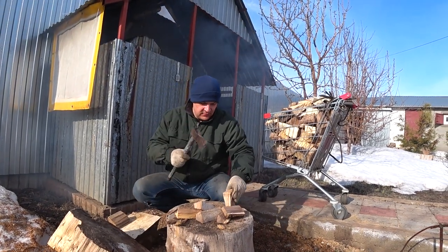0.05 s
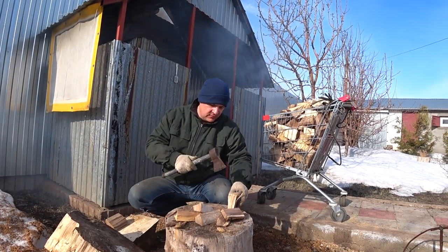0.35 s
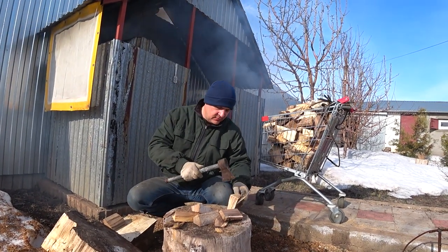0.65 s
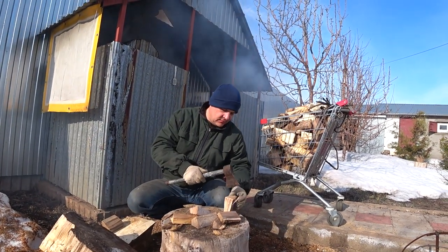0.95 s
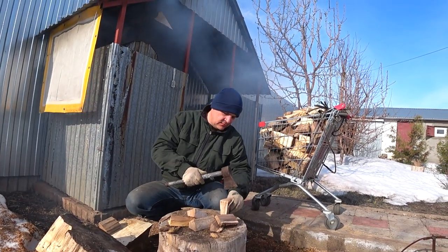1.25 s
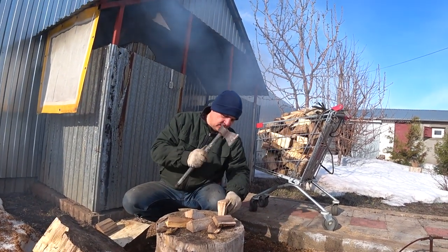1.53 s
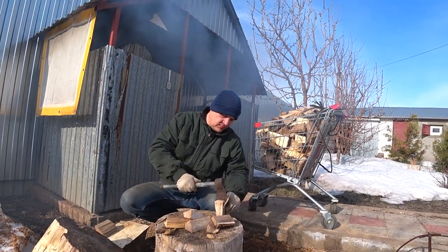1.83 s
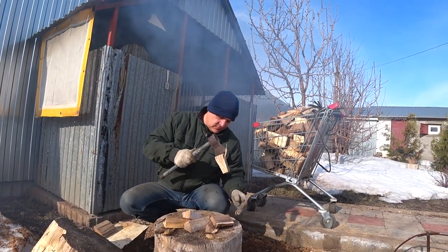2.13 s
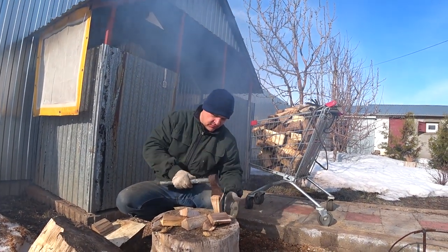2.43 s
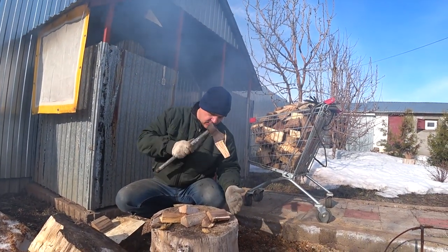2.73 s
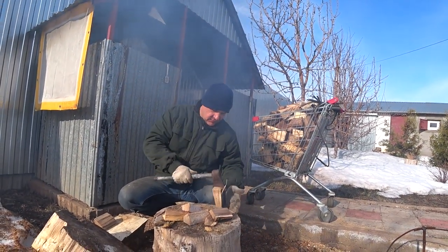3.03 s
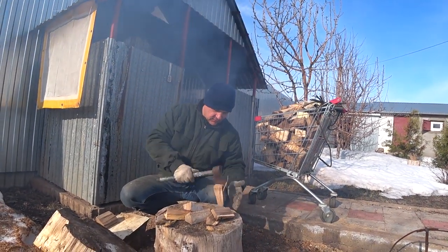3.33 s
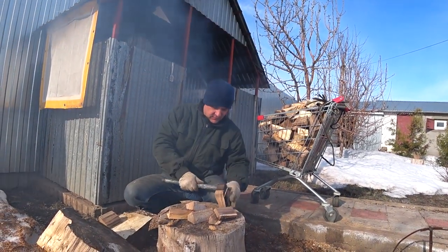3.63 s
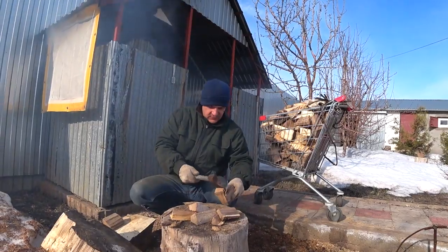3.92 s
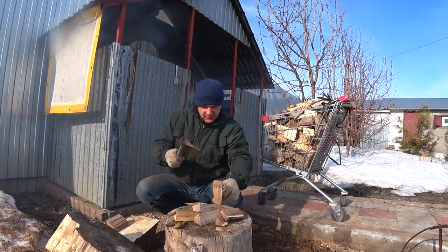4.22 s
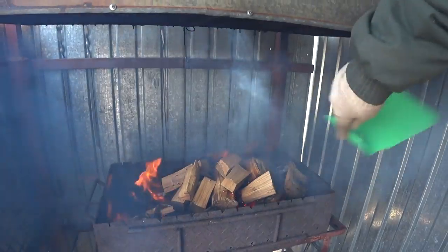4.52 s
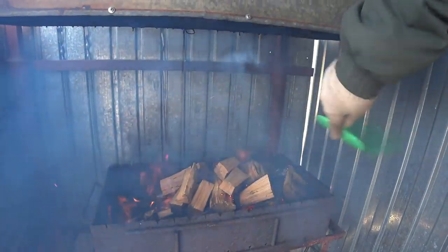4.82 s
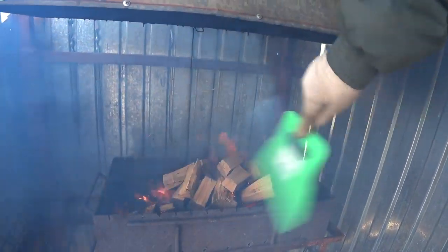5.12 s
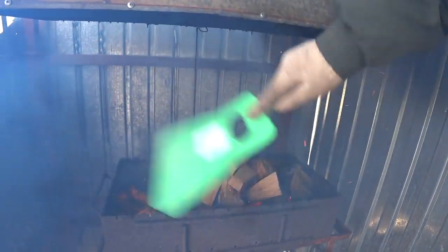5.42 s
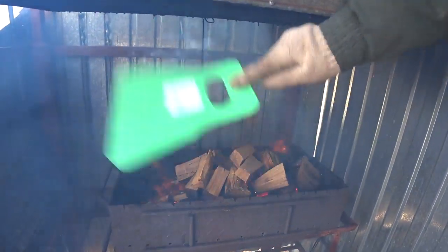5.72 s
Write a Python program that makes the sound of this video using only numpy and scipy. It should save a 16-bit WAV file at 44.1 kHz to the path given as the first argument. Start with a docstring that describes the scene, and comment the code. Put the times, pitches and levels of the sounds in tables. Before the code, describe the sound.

Wind rumbles on the microphone outdoors while kindling is set up with light clicks. Four sharp hatchet blows follow, with splintering wood, a hollow thud from the block and an echo around the yard. After a few more wooden ticks, the scene switches abruptly to a nearby fire in a metal grill. Embers hiss and pop, four fanning strokes whoosh through them, and a single sheet-metal clang rings out early on.

```python
"""A yard beside a sheet-metal shed: a hatchet splits kindling on a block. Each blow knocks and cracks,
billet and block ring, fibres tear, and the wall and yard echo. Then, close to a steel grill, a plastic
paddle fans a wood fire: it crackles and rushes with each stroke, and once the paddle hits the sheet
steel, which clangs. Wind buffets the microphone in both places."""
import sys
import numpy as np
from scipy import signal
from scipy.io import wavfile
from scipy.ndimage import uniform_filter1d

SR = 44100
rng = np.random.default_rng(int(sys.argv[2]) if len(sys.argv) > 2 else 0)


def log_audio(samples):
    """Write samples as a 16-bit WAV file to the path given in sys.argv[1]."""
    # one column per channel
    frames = np.atleast_2d(samples).T
    # limit to full scale, then quantise
    limited = np.clip(frames, -1, 1)
    pcm = np.round(limited * 32767).astype(np.int16)
    wavfile.write(sys.argv[1], SR, pcm)


N = 258426
TIME_S = np.arange(N) / SR
CHOP_END_S, FIRE_START_S = 4.402, 4.414
TICK_T60_S = 0.059

# hatchet blows: start_s, knock_db, knock_hz, billet_db, crack_db,
# landing_delay_s, landing_db, landing_hz, thud_db, echo_db, echo_hz
CHOPS = [(1.906, -0.5, 1110, -15.5, -12, 0.0102, -10, 1260, -20.5, -36, 1390),
         (2.4868, -1, 1150, -22, -15.5, 0.013, -7, 824, -25, -33.5, 1330),
         (3.0212, -10, 1264, -21.5, -12, 0.013, -7.5, 2100, -30, -30, 2510),
         (3.5013, -3, 940, -24.5, -21.5, 0.043, -15.5, 1070, -35, -42, 1270)]
# billet modes: pitch_hz, width_hz, level_db
BILLET_MODES = [(452, 70, -6), (840, 70, -7), (1160, 200, -2.5), (1401, 14, -4.5), (1687, 60, -2.5),
                (1980, 41, -3), (2200, 60, -18), (2823, 32, -6.5), (3680, 87, -7.5), (5900, 77, -18)]
# modes of block, hatchet head and grill sheet: pitch_hz, level_db, t60_s
BLOCK_MODES = [(398, -9.5, 0.15), (450.5, -4, .2), (945, -13.5, .3), (1190, -15.5, 0.23),
               (1297, -15.5, .36), (1436, -14.5, 0.45), (2099, -22, 0.43)]
BLADE_MODES = [(4180, -0.5, 0.2), (7574, -17, 0.56), (14090, -7, 0.22)]
SHEET_MODES = [(240, -18.5, 1.44), (289, -18, 1.17), (351.3, -14.5, 1.36), (481.4, -10, 0.79),
               (544, -16, 0.97), (575, -15, 0.56), (628, -17, .55), (827, -16, 0.75), (1072, -20, 0.72),
               (1110, -30, 0.48), (1354, -27, 0.71), (1484, -28, 0.63), (1622, -18, 0.44),
               (1913, -20.5, 0.42), (2560, -22, 0.29), (2700, -23, .35)]
# tears along the grain: start_s, level_db, t60_s
SPLITS = [(1.228, -31.5, 0.19), (2.501, -27.5, 0.028), (3.504, -17, 0.029), (3.5117, -19, 0.066),
          (3.54, -29, 0.048)]
# blade grazes: start_s, level_db
GRAZES = [(3.94, -55), (3.966, -43.5)]
# clicks of handled wood, pops of the fire: start_s, level_db, pitch_hz
WOOD_TICKS = [(0.196, -46.5, 900), (0.426, -43, 5800), (0.515, -34.5, 5500), (1.99, -41, 2140),
              (3.106, -27, 2400), (3.125, -35, 7000), (3.876, -36, 7200), (4.3248, -34, 7500),
              (4.3425, -36.5, 7060)]
FIRE_POPS = [(4.4155, -32, 3870), (4.885, -30, 10000), (5.4178, -21, 9400), (5.5593, -23.5, 5700)]
# billet shifting in the glove: start_s, end_s, level_db
HANDLING_SPANS = [(0.181, 0.602, -45), (3.781, 3.963, -38.5)]
# paddle strokes: centre_s, rush_db, puff_db
STROKES = [(4.546, -29, -16.5), (5.075, -30.5, -16.5), (5.345, -31, -7), (5.622, -27, -28)]
# time the clang stays level before it decays: freq_hz, hold_s
CLANG_HOLD = [(300, 0.071), (1200, 0.096), (4000, 0.044), (8000, 0.012), (15000, 0.013)]
# decay of clang and yard echo: freq_hz, t60_s
CLANG_T60 = [(200, 1), (500, 0.74), (1000, 0.44), (2000, 0.32), (4000, 0.27), (8000, 0.28), (15000, 0.093)]
YARD_T60 = [(150, 1.5), (700, 1.19), (1800, 1.196), (4000, 0.83), (8000, 0.35), (15000, 0.17)]
# breeze strength: time_s, level_db
BREEZE = [(0, -23.5), (0.22, -46), (0.5, -48), (0.92, -42.5), (1.15, -42.5), (1.3, -57), (1.44, -45.5),
          (1.78, -60), (1.95, -38), (2.25, -39), (2.5, -35), (3.2, -39), (3.48, -48.0), (4.1, -25.5),
          (4.33, -40), (4.55, -25.5), (5.05, -22.5), (5.86, -30.5)]
# gusts on the microphone ports: centre_s, level_db, pitch_hz, sigma_s
GUSTS = [(0.01, -22.5, 139.6, 0.016), (0.64, -40.5, 97, 0.03), (0.899, -34, 128, 0.008),
         (1.162, -32.5, 124, 0.007), (2.546, -22, 136, 0.011), (2.913, -30, 197, 0.008),
         (3.2, -30.5, 167, 0.007), (3.891, -21, 230, 0.0066), (3.914, -15.5, 280, 0.004),
         (3.943, -11, 302, 0.0046), (4.007, -15.5, 285, 0.006), (4.102, -18.5, 210, 0.008),
         (4.168, -14, 121, 0.007), (4.951, -12, 198, 0.0082), (5.267, -16.5, 242, 0.011)]

# noise spectra: freq_hz, density_db
CRACK_SPECTRUM = [(400, -9), (900, 3.5), (2500, 1.5), (4500, -9.5), (10000, -15), (16000, -32)]
THUD_SPECTRUM = [(110, -2), (250, -11), (430, 1), (600, -12), (900, -18)]
FIBRE_SPECTRUM = [(400, -7), (1200, -10.5), (2500, -7.5), (4400, -8.5), (6000, -6.5), (10700, -14),
                  (16000, -19)]
RUSH_SPECTRUM = [(160, -2.5), (250, -3.5), (450, -3), (700, -8), (1100, -16.5), (2200, -22), (5500, -27.5),
                 (10400, -33.5), (16000, -54)]
EMBER_SPECTRUM = [(200, 6), (450, 0), (900, -10.5), (2000, -19.5), (6000, -32), (10500, -23.5),
                  (15500, -37)]
CLANG_SPECTRUM = [(120, -18), (200, -12), (548, -2), (763, -9), (821, -5), (1400, -12.5), (1650, -9),
                  (2250, -12.5), (2560, -11), (10100, -25), (16000, -34)]
YARD_SPECTRUM = [(200, 0.5), (450, -10), (700, -0.5), (1400, 1.5), (3000, -1.5), (6000, -10.5), (10000, -8),
                 (15000, -29.5)]
WIND_SPECTRUM = [(20, 0.5), (45, -1), (90, -3.5), (170, -11), (300, -26.5), (600, -31.5), (1200, -64)]
AIR_SPECTRUM = [(200, -11.5), (450, -4.5), (800, -8.5), (1600, -10.5), (4000, -16.5), (6500, -18),
                (10000, -21.5), (16000, -19.5)]
# left-right likeness: freq_hz, correlation
DIRECT_CORR = [(200, 1), (10000, 0.85)]
NEAR_CORR = [(300, 1), (1200, 0.65), (10000, 0.87)]
DIFFUSE_CORR = [(200, 0.91), (1500, 0.2), (10000, 0.27)]
WIND_CORR = [(30, 1), (90, 0.37), (200, -0.66), (500, -1)]
EDDY_CORR = [(40, 0.48), (150, -0.12), (400, -0.77)]


def hatchet(thud_t60_s=0.11, wall_db=-13, splinter_db=-33, splinters_per_blow=12):
    """The blade bites and drives the billet onto the block, which thuds and rings; splinters snap."""
    out, t = np.zeros((2, N)), TIME_S[:SR // 2]
    for start_s, knock_db, knock_hz, billet_db, crack_db, *landing in CHOPS:
        delay_s, landing_db, landing_hz, thud_db, *_ = landing
        add(out, start_s, wood_hit(t, knock_db, knock_hz, billet_db, crack_db))
        lands = wood_hit(t, landing_db, landing_hz, billet_db=landing_db - 19, crack_db=landing_db - 13.5)
        add(out, start_s + delay_s, lands)
        thud = noise(THUD_SPECTRUM, DIRECT_CORR, t) * decay(t, thud_t60_s)
        hollow = sum(from_db(db) * ring(t, hz, t60_s) for hz, db, t60_s in BLOCK_MODES)
        add(out, start_s + 0.007, from_db(thud_db) * (thud + hollow) * rise(t, 0.013))
    splinters = [(start_s + 0.02 + 0.14 * late ** 2, splinter_db - 12 * late, 2000 + 6000 * high)
                 for start_s, *_ in CHOPS for late, high in rng.random((splinters_per_blow, 2))]
    return out + from_db(wall_db) * wall_echo(out) + yard_echo() + snaps(splinters, t60_s=0.015)


def wood_hit(t, knock_db, knock_hz, billet_db, crack_db):
    """Struck wood: a dead knock, a bright crack and billet modes, the broad ones dying first."""
    modes = 0
    for hz, width_hz, db in BILLET_MODES:
        gain = from_db(db + rng.normal(0, 2)) * rng.choice([-1, 1])
        modes += gain * knock(t, hz, t60_s=0.048 * np.sqrt(50 / width_hz))
    crack = noise(CRACK_SPECTRUM, DIRECT_CORR, t) * decay(t, t60_s=0.032)
    crack *= from_db(3.7 * drift(770, len(t)))
    body = knock(t, knock_hz, t60_s=0.011)
    return from_db(knock_db) * body + from_db(billet_db) * modes + from_db(crack_db) * crack


def knock(t, hz, t60_s):
    """A damped wooden mode that swells during contact."""
    return ring(t, hz, t60_s) * rise(t, 0.0016)


def splitting(grain_db=1.0, wall_db=-12):
    """Fibres give way in a dense run of tiny snaps."""
    out, t = np.zeros((2, N)), TIME_S[:SR // 3]
    for start_s, db, t60_s in SPLITS:
        tearing = noise(FIBRE_SPECTRUM, DIRECT_CORR, t) * from_db(grain_db * drift(1200, len(t)))
        add(out, start_s, from_db(db) * tearing * decay(t, t60_s) * rise(t, 0.0025))
    return out + from_db(wall_db) * wall_echo(out)


def blade(tick_above_ring_db=11, tick_hz=4000):
    """The steel head clicks and sings faintly as it grazes the wood."""
    out, t = np.zeros((2, N)), TIME_S[:SR // 2]
    modes = sum(from_db(db) * ring(t, hz, t60_s) for hz, db, t60_s in BLADE_MODES)
    for start_s, db in GRAZES:
        add(out, start_s, from_db(db) * modes)
    ticks = [(start_s, db + tick_above_ring_db, tick_hz) for start_s, db in GRAZES]
    return out + snaps(ticks, TICK_T60_S)


def handling(stick_hz=(2300, 3050, 4360, 6770), stick_q=44, stick_db=4.5, sleeve_db=-60, per_span=4):
    """A sleeve rustles as the arm lifts; thin kindling clicks and rings as it is set up and turned."""
    shifts = [(start_s + when * (end_s - start_s), db - 6 * soft, 3500 + 4000 * high)
              for start_s, end_s, db in HANDLING_SPANS for when, soft, high in rng.random((per_span, 3))]
    clicks = snaps(WOOD_TICKS + shifts, TICK_T60_S)
    sticks = sum(resonate(clicks + 1e-18, hz, stick_q) for hz in stick_hz)
    cloth = noise([(1500, 1), (9000, -2), (15000, -17)], NEAR_CORR, TIME_S)
    sleeve = swell(TIME_S, centre_s=0.036, sigma_s=0.065) * cloth
    return 0.98 * clicks + from_db(stick_db) * sticks + from_db(sleeve_db) * sleeve


def fire(burn_db=-41, flutter_db=3.0, backswing_s=0.13, backswing_db=-10.5, crackle_db=-47, count=30):
    """Embers hiss, crackle and pop; each stroke and its backswing drive air through them."""
    draught = 0
    for centre_s, db, _ in STROKES:
        stroke = swell(TIME_S, centre_s, sigma_s=0.024)
        backswing = swell(TIME_S, centre_s + backswing_s, sigma_s=0.045)
        draught += from_db(db) * (stroke + from_db(backswing_db) * backswing)
    rush = draught * from_db(flutter_db * drift(130, N)) * noise(RUSH_SPECTRUM, NEAR_CORR, TIME_S)
    burn = from_db(burn_db) * noise(EMBER_SPECTRUM, NEAR_CORR, TIME_S)
    span_s = TIME_S[-1] - FIRE_START_S
    crackles = [(FIRE_START_S + when * span_s, crackle_db + 13 * size ** 2, 4000 + 7000 * high)
                for when, size, high in rng.random((count, 3))]
    crackling = snaps(crackles, t60_s=0.026) + snaps(FIRE_POPS, t60_s=0.065)
    return (rush + burn) * (TIME_S > FIRE_START_S) + crackling


def clang(start_s=4.733, dense_db=-16, modes_db=-6, build_s=0.069):
    """The paddle hits sheet steel; the clang holds briefly, then fades as low modes build and ring on."""
    out, t = np.zeros((2, N)), TIME_S[:SR * 3 // 2]
    dense = noise(CLANG_SPECTRUM, NEAR_CORR, t,
                  lambda hz: decay(t - at_hz(CLANG_HOLD, hz), at_hz(CLANG_T60, hz)))
    modes = sum(from_db(db) * ring(t + rng.random() / hz, hz, t60_s) for hz, db, t60_s in SHEET_MODES)
    add(out, start_s, from_db(dense_db) * dense * rise(t, 0.0056))
    add(out, start_s, from_db(modes_db) * modes * rise(t, build_s))
    return out


def wall_echo(dry, t60_s=0.34):
    """Quick scattered echoes off the shed wall and the ground."""
    t = TIME_S[:SR // 3]
    scatter = noise([(150, 14.0), (1200, 4.5), (4000, -0.5), (15000, 2.0)], NEAR_CORR, t)
    response = unit_rms(scatter * decay(t, t60_s) * rise(t, 0.019)) / np.sqrt(len(t))
    return signal.fftconvolve(dry, response, axes=1)[:, :N]


def yard_echo(focus_db=4.5, focus_oct=0.77, peak_q=2.8, peak_mix=0.91):
    """Fences and trees scatter each blow into a long tail, strongest around one pitch."""
    out, t = np.zeros((2, N)), TIME_S[:SR]
    for start_s, *_, echo_db, echo_hz in CHOPS:
        def envelope(hz):
            focus = np.exp(-0.5 * (np.log2(hz / echo_hz) / focus_oct) ** 2)
            return from_db(focus_db * (focus - 1)) * decay(t, at_hz(YARD_T60, hz))
        tail = noise(YARD_SPECTRUM, DIFFUSE_CORR, t, envelope)
        tail = (tail + peak_mix * resonate(tail, echo_hz, peak_q)) / np.sqrt(1 + peak_mix)
        add(out, start_s, from_db(echo_db) * tail * rise(t, 0.09))
    return out


def wind(trim_db=-1.5, lump_db=4.5, tilt_per_oct=0.36, neutral_db=-36, top_hz=650):
    """Lumpy turbulence on the microphone ports, brighter when it blows harder."""
    gust_db = breeze_db(TIME_S) + lump_db * drift(40, N)
    tilt_db_per_oct = tilt_per_oct * (gust_db - neutral_db)
    rumble = noise(WIND_SPECTRUM, WIND_CORR, TIME_S,
                   lambda hz: from_db(trim_db + gust_db + tilt_db_per_oct * max(np.log2(hz / 70), 0)))
    return lowpass(rumble, top_hz, order=4)


def eddies(puff_delay_s=0.094, ragged_db=2.0, count=36, top_hz=1020):
    """Gusts, paddle puffs and small chance eddies push on one port and pull on the other."""
    # columns as in GUSTS
    puffs = [(stroke_s + puff_delay_s, db, 201, 0.005) for stroke_s, _, db in STROKES]
    times_s = (np.arange(count) + rng.random(count)) * TIME_S[-1] / count
    small = [(centre_s, breeze_db(centre_s) + rng.normal(-2, 2.5), 190, 0.004) for centre_s in times_s]
    out = np.zeros((2, N))
    for centre_s, db, hz, sigma_s in GUSTS + puffs + small:
        start_s = max(centre_s - 4 * sigma_s, 0)
        t = TIME_S[:round(8 * sigma_s * SR)]
        push = swell(start_s + t, centre_s, sigma_s)
        spectrum = [(hz / 3, -6), (hz, 0), (hz * 2, -12), (hz * 5, -42)]
        eddy = push * from_db(ragged_db * drift(150, len(t))) * noise(spectrum, EDDY_CORR, t)
        add(out, start_s, from_db(db) * unit_rms(eddy) * np.sqrt(np.mean(push ** 2)))
    return lowpass(out, top_hz, order=4)


def breeze_db(t):
    """Breeze strength at time t."""
    return np.interp(t, *np.transpose(BREEZE))


def air(hiss_db=-60, port_hz=7900, port_width_hz=900, port_db=-73):
    """Faint outdoor hiss with a small resonance of the microphone port."""
    port = resonate(rng.standard_normal(N), port_hz, port_hz / port_width_hz)
    hiss = noise(AIR_SPECTRUM, DIFFUSE_CORR, TIME_S)
    return from_db(hiss_db) * hiss + from_db(port_db) * unit_rms(port)


def snaps(rows, t60_s):
    """Dry clicks, each a noise burst in one broad band."""
    out, t = np.zeros((2, N)), TIME_S[:SR // 10]
    envelope = decay(t, t60_s) + 2 * decay(t, 0.011)
    for start_s, peak_db, hz in rows:
        white = rng.standard_normal(len(t)) + 0.3 * rng.standard_normal((2, len(t)))
        click = bandpass(white * envelope, hz * 0.57, min(hz * 1.8, 0.33 * SR))
        add(out, start_s, from_db(peak_db) * click / np.abs(click).max())
    return out


def noise(spectrum, correlation, t, envelope=lambda hz: 1):
    """Stereo noise in half-octave bands, rms 1 before each band gets its envelope(hz)."""
    edges_hz = 20 * 2 ** np.arange(0, 10.1, 0.5)
    white = rng.standard_normal((2, 2, len(t) + 4000))
    out, power = np.zeros((2, len(t))), 0
    for band, (low_hz, high_hz) in enumerate(zip(edges_hz, edges_hz[1:])):
        if high_hz < spectrum[0][0] or low_hz > spectrum[-1][0]:
            continue
        hz = np.sqrt(low_hz * high_hz)
        mid, side = bandpass(white[band % 2], low_hz, high_hz)[:, -len(t):]
        alike = np.clip(at_hz(correlation, hz), -1, 1)
        stereo = np.sqrt(1 + alike) * mid + np.sqrt(1 - alike) * side * [[1], [-1]]
        gain = from_db(at_hz(spectrum, hz))
        out += gain * envelope(hz) * stereo
        power += 2 * gain ** 2 * (high_hz - low_hz) / (SR / 2)
    return out / np.sqrt(power)


def ring(t, hz, t60_s):
    """A struck mode of height 1."""
    return np.sin(2 * np.pi * hz * t) * decay(t, t60_s)


def decay(t, t60_s):
    """Exponential decay, flat before t = 0."""
    return np.exp(-np.log(1000) * np.maximum(t, 0) / t60_s)


def rise(t, rise_s):
    """Exponential attack from 0 to 1."""
    return 1 - decay(t, rise_s)


def swell(t, centre_s, sigma_s):
    """Bell-shaped rise and fall."""
    return np.exp(-0.5 * ((t - centre_s) / sigma_s) ** 2)


def drift(rate_hz, samples):
    """Smooth random wander, spread about 1."""
    return np.interp(TIME_S[:samples] * rate_hz, np.arange(4000), rng.standard_normal(4000))


def resonate(x, hz, q):
    """One resonant peak."""
    return signal.lfilter(*signal.iirpeak(hz, q, fs=SR), x)


def bandpass(x, low_hz, high_hz):
    """Keep one band."""
    return signal.sosfilt(signal.butter(2, [low_hz, high_hz], "band", fs=SR, output="sos"), x)


def lowpass(x, top_hz, order):
    """Roll off the treble."""
    return signal.sosfilt(signal.butter(order, top_hz, fs=SR, output="sos"), x)


def at_hz(table, hz):
    """Read a table on a log-frequency axis."""
    freqs_hz, values = np.transpose(table)
    return np.interp(np.log(hz), np.log(freqs_hz), values)


def from_db(db):
    """Decibels to gain."""
    return 10 ** (np.asarray(db) / 20)


def unit_rms(x):
    """Scale to rms 1."""
    return x / np.sqrt(np.mean(x ** 2) + 1e-20)


def add(out, start_s, sound):
    """Mix a sound in at start_s."""
    start = max(round(start_s * SR), 0)
    out[:, start:start + sound.shape[-1]] += sound[..., :N - start]


def scene():
    """Chopping, a blink of silence at the change of place, then the fanned fire; wind and hiss in both."""
    chopping = hatchet() + splitting() + blade() + handling()
    outdoors = wind() + eddies() + air()
    gate = uniform_filter1d(1.0 * ((TIME_S < CHOP_END_S) | (TIME_S > FIRE_START_S)), size=60)
    return gate * (chopping + clang() + fire() + outdoors)


def record(dry, droop_hz=14500, clip_level=0.8, stopband_hz=16700):
    """The microphone loses a little treble, rare peaks clip and the top is cut."""
    clipped = np.clip(lowpass(dry, droop_hz, order=2), -clip_level, clip_level)
    return signal.sosfilt(signal.cheby2(16, 60, stopband_hz, fs=SR, output="sos"), clipped)


dry = scene()
out = record(dry)
log_audio(out)
```